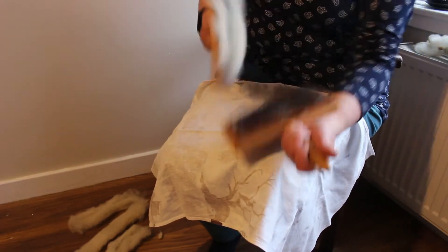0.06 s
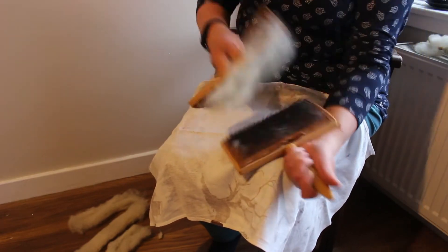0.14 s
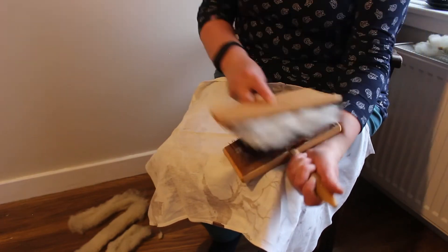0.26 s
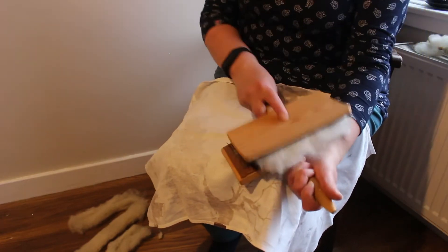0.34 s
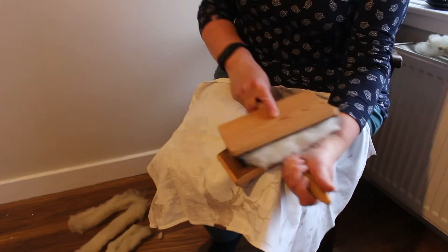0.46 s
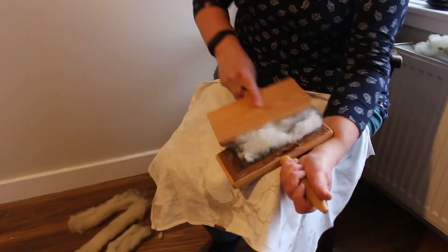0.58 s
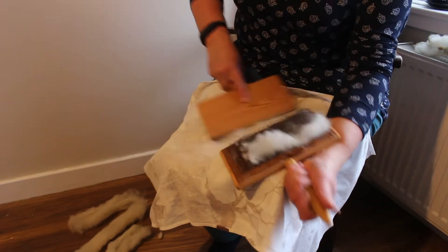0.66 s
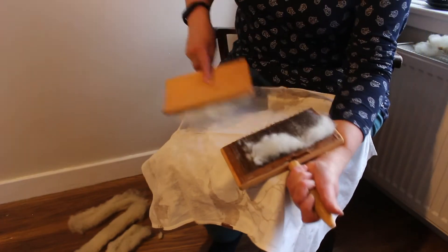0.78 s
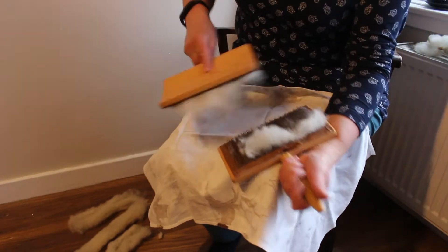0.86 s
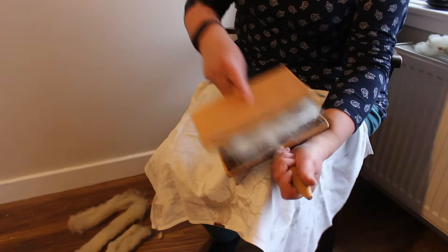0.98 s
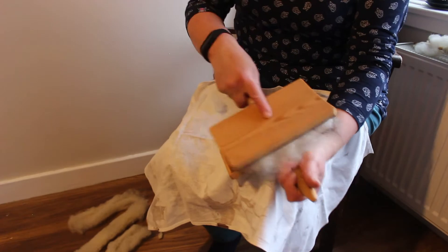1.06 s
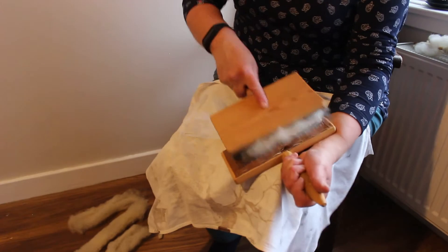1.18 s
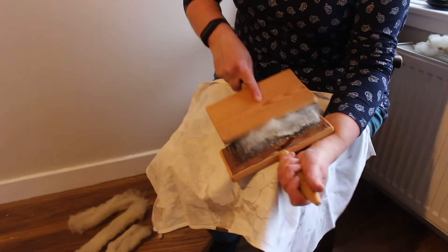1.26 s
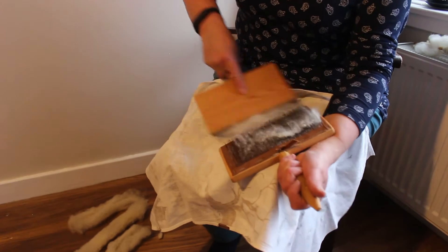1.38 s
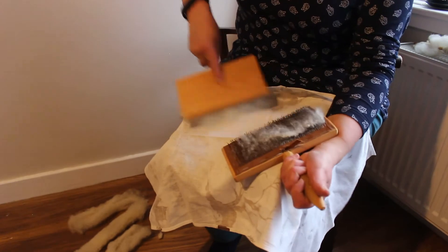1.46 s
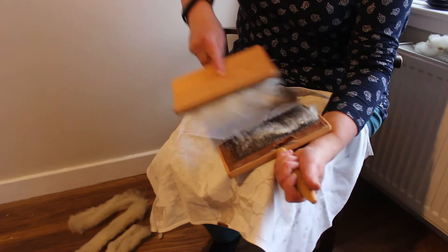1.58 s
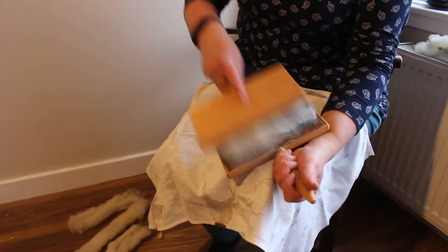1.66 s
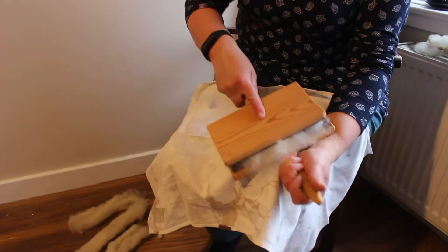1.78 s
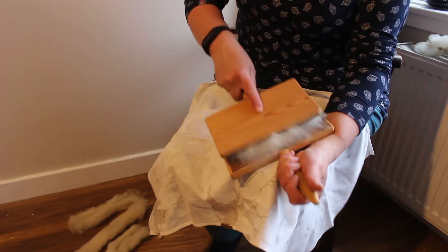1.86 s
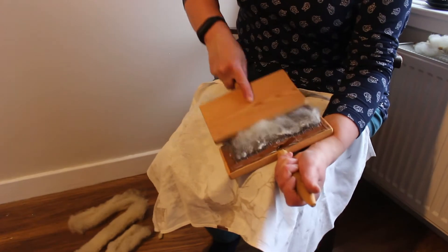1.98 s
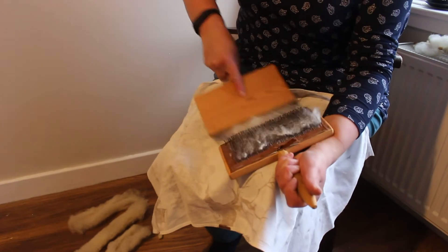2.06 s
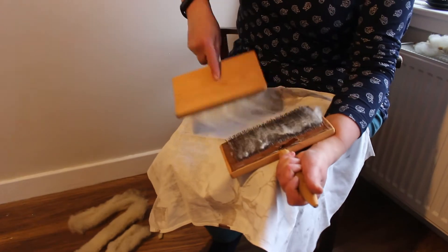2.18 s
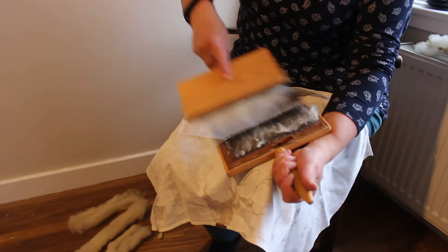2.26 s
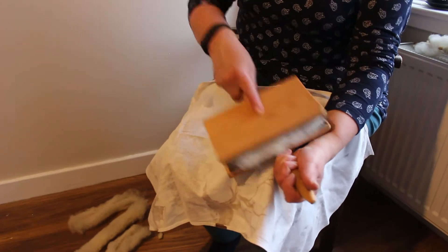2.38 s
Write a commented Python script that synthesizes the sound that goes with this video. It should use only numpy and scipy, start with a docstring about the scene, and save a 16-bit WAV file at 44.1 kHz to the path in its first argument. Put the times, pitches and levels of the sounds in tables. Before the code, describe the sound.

Hand carding of wool: soft thuds, then three dry, scratchy drags of wire teeth on wooden paddles

```python
"""Three soft, low pats come first, over a murmuring quiet room: the upper of two wire-toothed wool carders
lands on the lower one, worked on a lap. Three rasping draws follow as thousands of teeth slip past each other.
Random clicks, coloured and rung, make the teeth and wooden boards; dying low tones make the thumps.
Noise makes the low boom and room air, a short tail of sparse taps makes the small room.
The same sound reaches both channels, each under its own faint preamplifier hiss."""
import sys
import numpy as np
from scipy import signal
from scipy.fft import rfft, irfft
from scipy.io import wavfile
from scipy.ndimage import uniform_filter1d

SR = 44100
rng = np.random.default_rng(int(sys.argv[2]) if len(sys.argv) > 2 else 0)


def unload_audio(sound):
    """Save the sound as a 16-bit wav file, at the path given as the first command line argument."""
    columns = np.transpose(np.atleast_2d(sound))
    # keep every value between -1 and 1, then stretch to whole-number steps
    steps = np.round(np.clip(columns, -1, 1) * 32767)
    wavfile.write(sys.argv[1], SR, steps.astype(np.int16))


N = 105840

# Preamplifier hiss, relative spectrum: pitch_hz, level_db (per Hz)
HISS_SPECTRUM = [(100, -4), (500, 3.5), (2000, -11.5), (8000, -0.5), (16000, 2.5)]
# Murmur of the room, relative spectrum: pitch_hz, level_db (per Hz)
AIR_SPECTRUM = [(53, -34), (90, -16.5), (142, -13.5), (162, -14), (239, -17.5), (352, -23.5), (419, -24.5),
                (467, -25), (16000, -47)]
# Boom near 83 Hz along time: time_s, level_db
BOOM_LEVEL = [(0.0, -51), (0.15, -54.5), (0.19, -44.5), (0.61, -69), (0.75, -43), (0.77, -35),
              (0.91, -40.5), (1.09, -56), (1.14, -47.5), (1.57, -60), (1.6, -40), (2.02, -52), (2.19, -36),
              (2.25, -66), (2.31, -46.5), (2.4, -66)]
# Rumble near 44 Hz along time: time_s, level_db
RUMBLE_LEVEL = [(0, -53), (.5, -44), (.8, -43), (1, -53), (1.3, -46.5), (1.7, -52.5), (2, -42.5),
                (2.18, -44), (2.25, -50), (2.4, -58)]
# Decay of the small room: pitch_hz, t60_s
ROOM_DECAY = [(200, 0.41), (1000, 0.25), (4000, 0.35), (7000, 0.1), (11000, 0.39)]
# Paddle landings: start_s, level_db, pitch_hz
LANDINGS = [(.199, -12.5, 45), (0.305, -14, 45.8), (.427, -17, 44.9), (0.688, -21, 44.7),
            (1.171, -29.5, 44.8), (1.225, -27.5, 46.6), (1.817, -17, 45.8), (2.051, -34, 49)]
# Teeth meshing or tearing free at once: peak_s, crunch_db, build_s, fall_s, settling_db, board_db,
# ping_hz (a wire), ping_db
TOOTH_MESHES = [(0.202, -41.5, 0.0042, 0.0017, -42, -58, 3100, -66),
                (0.31, -26, 0.0076, 0.00071, -34.5, -39.5, 5250, -49),
                (0.414, -35.5, 0.0059, 0.0092, -35, -52.5, 2750, -72),
                (.535, -26.5, 0.0036, 0.0028, -52, -63, 5140, -50),
                (.763, -31, 0.004, 0.0046, -39.5, -71, 7740, -55),
                (0.783, -46, 0.011, 0.0022, -37.5, -64, 2700, -35.5),
                (1.162, -53, 0.0069, .003, -45.5, -63, 4070, -78),
                (1.365, -26, 0.0019, 0.0011, -53, -65, 1900, -43.5),
                (1.814, -26.5, 0.013, 0.0033, -34, -45, 1900, -53.5)]
# Wool brushing as the paddle swings back, one table per swing: time_s, level_db
WOOL_BRUSH = [
    [(0, -57), (.08, -53.5), (.16, -55)],
    [(.88, -51), (.96, -45), (1.03, -51.5), (1.1, -63)],
]
# One table per drawn stroke: time_s, scrape_db (teeth), board_db (ring), sizzle_db (fine treble),
# rumble_db (low board), hollow_db (body under the ring)
DRAWN_STROKES = [
    [(0.42, -33.5, -43, -68, -46, -35), (0.452, -49.5, -44, -72, -56, -59),
     (0.474, -36.5, -43, -64, -48, -45.5), (0.542, -31.5, -40, -58, -47.5, -38.5),
     (0.62, -19.5, -26.5, -45, -34, -26), (0.704, -22, -27, -49, -40.5, -33),
     (0.748, -32.5, -43, -76, -30, -40.5), (0.784, -23.5, -46, -68, -32, -40),
     (0.806, -40.5, -36, -74, -43, -41), (0.852, -48, -47.5, -78, -45.5, -60),
     (0.9, -65, -74, -69, -67, -60)],
    [(1.15, -46.5, -68, -81, -68, -61), (1.176, -37, -37.5, -64, -48.5, -37),
     (1.21, -31, -37.5, -56, -47, -44.5), (1.278, -29.5, -30, -57, -49, -42),
     (1.304, -32.5, -37.5, -58, -53, -38.5), (1.386, -29, -38.5, -58, -46.5, -40),
     (1.408, -32.5, -36, -60, -46, -40), (1.434, -38.5, -54, -63, -47, -43.5),
     (1.45, -39.5, -46, -73, -50, -53), (1.556, -59, -70, -77, -70, -71), (1.58, -58, -66, -72, -63, -75)],
    [(1.82, -33, -35, -61, -34.5, -41), (1.846, -35.5, -39, -64, -55, -40),
     (1.894, -35, -38.5, -61, -65, -45), (1.924, -27, -28, -54.5, -44, -31.5),
     (2.062, -23, -30.5, -49.5, -42, -36.5), (2.078, -23.5, -33.5, -50, -36.5, -35),
     (2.156, -40, -51, -75, -61, -51.5), (2.18, -41.5, -57, -73, -57, -54),
     (2.212, -50, -61, -80, -77, -69), (2.276, -60, -78, -80, -57, -83), (2.3, -66, -79, -79, -57, -69)],
]
# Scraping teeth, relative spectrum: pitch_hz, level_db (per Hz)
TEETH_SPECTRUM = [(400, -8), (600, -12), (900, -10), (1500, -3), (1900, -3), (3000, -6.5), (4000, -6.5),
                  (4900, -5.5), (6000, -11), (7000, -18.5), (8500, -26.5), (10500, -42), (13000, -58)]
# Fine treble sizzle, relative spectrum: pitch_hz, level_db (per Hz)
SIZZLE_SPECTRUM = [(8500, -12), (10000, 1), (11000, -6), (12300, 3), (14800, 6.5), (16000, 4)]
# Ringing board, relative levels: pitch_hz, width_hz (of one pass), level_db
BOARD_MODES = [(1121, 320, 3.5), (1814, 550, -6.5), (2546, 330, -13.5), (4160, 300, -18.5)]
# Low board resonances, relative levels: pitch_hz, width_hz, level_db
LOW_BOARD_MODES = [(135, 19, -0.5), (198, 23, -4), (252.5, 85, 3), (287, 36, -12.5)]
# Hollow body under the ring, relative levels: pitch_hz, width_hz (of one pass), level_db
HOLLOW_MODES = [(631.4, 513, -4.5), (878, 333, -0.5), (1337, 230, -6)]

HISS_DB, AIR_DB, ROOM_DB = -64.5, -49.5, -10.5
EDGE_HZ = 15800  # upper band limit
BOOM_HZ, BOOM_WIDTH_HZ = 82.8, 28.4
RUMBLE_HZ, RUMBLE_WIDTH_HZ = 43.5, 39
THUMP_RISE_S, THUMP_T60_S = 0.012, 0.36
SLIPS_PER_S, SLIP_SPREAD_DB, CLUMP_DB = 6000, 0.5, -1
MESH_LOW_HZ, SETTLE_S, PING_WIDTH_HZ = 1530, 0.046, 880
# A struck board rings narrower than a scraped one, just before the peak
KNOCK_WIDTH_RATIO, KNOCK_LEAD_S = 0.61, 0.003
MESH_BEFORE, MESH_AFTER = 1024, 7168  # samples around each peak


def amp(db):
    """Turns decibels into linear gain."""
    return 10 ** (np.asarray(db) / 20)


def evened(x):
    """Scales to an rms of one."""
    return x / np.sqrt(np.mean(x ** 2) + 1e-20)


def colour(x, points):
    """Filters by a spectrum in dB, 20 dB down beyond its end points."""
    point_hz, point_db = np.transpose(points)
    bin_hz = np.fft.rfftfreq(len(x), 1 / SR)
    bin_db = np.interp(np.log(bin_hz + 1), np.log(point_hz + 1), point_db,
                       left=point_db[0] - 20, right=point_db[-1] - 20)
    return irfft(rfft(x) * amp(bin_db), len(x))


def ring(x, modes):
    """Sum of two-pole resonances, each at its own rms level."""
    out = np.zeros(len(x))
    for pitch_hz, width_hz, level_db in modes:
        radius = np.exp(-np.pi * width_hz / SR)
        poles = [1, -2 * radius * np.cos(2 * np.pi * pitch_hz / SR), radius * radius]
        out += amp(level_db) * evened(signal.lfilter([1, 0, -1], poles, x))
    return out


def ring_twice(x, modes):
    """Steep resonances: each is applied two times, then the sum is evened."""
    return evened(sum(ring(ring(x, [mode]), [mode]) for mode in modes))


def level(tables, column):
    """Smoothed gain along time from one dB column; practically silent outside the tables."""
    t, out = np.arange(N) / SR, np.zeros(N)
    for rows in map(np.array, tables):
        out += amp(np.interp(t, rows[:, 0], rows[:, column], left=-120, right=-120))
    return uniform_filter1d(out, size=200)


def room_air():
    """Steady coloured noise: the murmur of the quiet room."""
    return amp(AIR_DB) * evened(colour(rng.standard_normal(N), AIR_SPECTRUM))


def boom():
    """Two wavering low bands of noise that come and go."""
    noise = rng.standard_normal((2, N))
    boom_band = ring_twice(noise[0], [(BOOM_HZ, BOOM_WIDTH_HZ, 0)])
    rumble_band = ring_twice(noise[1], [(RUMBLE_HZ, RUMBLE_WIDTH_HZ, 0)])
    return level([BOOM_LEVEL], column=1) * boom_band + level([RUMBLE_LEVEL], column=1) * rumble_band


def room_tail(x):
    """Small room: sparse taps of random sign, each band dying at its own speed."""
    taps = np.zeros(SR // 2)
    at = np.arange(200, len(taps) - 20, 20)
    taps[at + rng.integers(0, 20, len(at))] = rng.choice([-1., 1.], len(at))
    hz, t, bands = signal.stft(taps, SR, nperseg=256)
    t60 = np.interp(hz, *np.transpose(ROOM_DECAY))
    tail = signal.istft(bands * amp(-60 * t / t60[:, None]), SR, nperseg=256)[1]
    return signal.fftconvolve(x, tail / np.linalg.norm(tail))[:N]


def thumps():
    """Paddle landings reach the microphone as softly rising, dying low tones."""
    out = np.zeros(N)
    for start_s, level_db, pitch_hz in LANDINGS:
        t = np.maximum(np.arange(N) / SR - start_s, 0)
        decay = amp(level_db - 60 * t / THUMP_T60_S)
        rise = 1 - np.exp(-t / THUMP_RISE_S)
        out += decay * rise * np.sin(2 * np.pi * pitch_hz * t)
    return out


def slips():
    """Dense clicks of uneven size, clumping a little, as single teeth let go."""
    spread = np.minimum(rng.exponential(1, N), 4)
    size = amp(SLIP_SPREAD_DB * spread) * rng.choice([-1., 1.], N)
    clumps = evened(uniform_filter1d(rng.standard_normal(N), size=300))
    lets_go = rng.random(N) < SLIPS_PER_S / SR
    return size * lets_go * amp(CLUMP_DB * clumps)


def meshes():
    """Short crunches: clicks pile up for some milliseconds, knock the board, ping a wire, and settle."""
    clicks = slips()
    high_pass = signal.butter(3, MESH_LOW_HZ, "high", fs=SR)
    thin = signal.lfilter(*high_pass, colour(clicks, TEETH_SPECTRUM))
    struck_modes = [(hz, width * KNOCK_WIDTH_RATIO, db) for hz, width, db in BOARD_MODES]
    out, t = np.zeros(N), np.arange(-MESH_BEFORE, MESH_AFTER) / SR
    after = np.maximum(t, 0)
    knock = np.diff(t > -KNOCK_LEAD_S, prepend=False) * 1.  # a single impulse
    for peak_s, crunch_db, build_s, fall_s, settling_db, board_db, ping_hz, ping_db in TOOTH_MESHES:
        peak = round(peak_s * SR)
        at = slice(peak - MESH_BEFORE, peak + MESH_AFTER)
        build = np.exp(-(np.minimum(t, 0) / build_s * 2) ** 2)
        crunch = build * np.exp(-after / fall_s)
        settling = build * np.exp(-after / SETTLE_S)
        out[at] += (amp(crunch_db) * crunch + amp(settling_db) * settling) * evened(thin[at])
        out[at] += amp(board_db) * ring_twice(knock, struck_modes)
        out[at] += amp(ping_db) * ring_twice(crunch * clicks[at], [(ping_hz, PING_WIDTH_HZ, 0)])
    return out


def strokes():
    """Slipping teeth scrape, brush and sizzle, and set the boards ringing and rumbling, along each movement."""
    clicks = slips()
    scrape_gain = level(DRAWN_STROKES, column=1) + level(WOOL_BRUSH, column=1)
    scrape = scrape_gain * evened(colour(clicks, TEETH_SPECTRUM))
    board = level(DRAWN_STROKES, column=2) * ring_twice(clicks, BOARD_MODES)
    sizzle = level(DRAWN_STROKES, column=3) * evened(colour(clicks, SIZZLE_SPECTRUM))
    low_board = level(DRAWN_STROKES, column=4) * evened(ring(clicks, LOW_BOARD_MODES))
    hollow = level(DRAWN_STROKES, column=5) * ring_twice(clicks, HOLLOW_MODES)
    return scrape + board + sizzle + low_board + hollow


def scene():
    """Carders with their room tail, thumps, boom and air, alike in both channels."""
    carders = strokes() + meshes()
    mid = carders + amp(ROOM_DB) * room_tail(carders) + thumps() + boom() + room_air()
    return np.array([mid, mid])


def record(dry):
    """Adds unrelated hiss of the two preamplifiers, then limits the band."""
    noise = rng.standard_normal((2, N))
    hiss = amp(HISS_DB) * np.array([evened(colour(channel, HISS_SPECTRUM)) for channel in noise])
    low_pass = signal.firwin(1023, EDGE_HZ, window=("kaiser", 9), fs=SR)
    return signal.oaconvolve(dry + hiss, low_pass[None], "same")


dry = scene()
out = record(dry)
unload_audio(out)
```